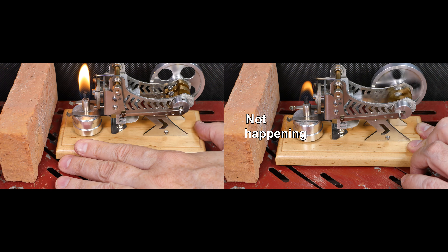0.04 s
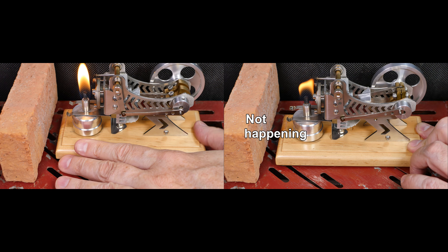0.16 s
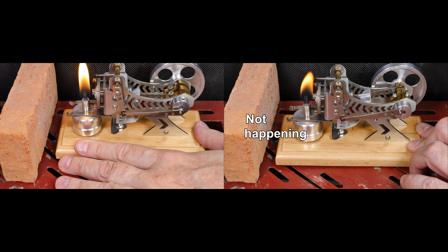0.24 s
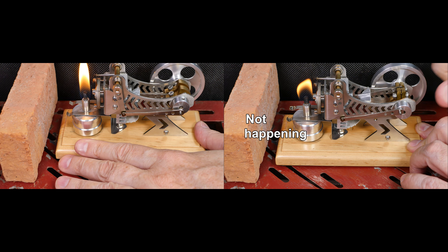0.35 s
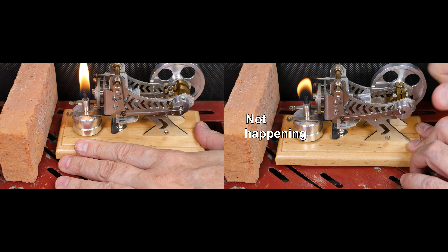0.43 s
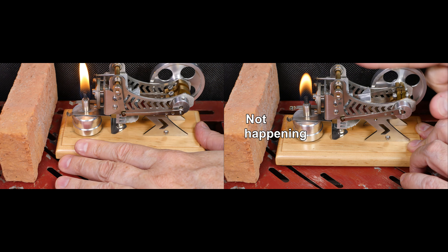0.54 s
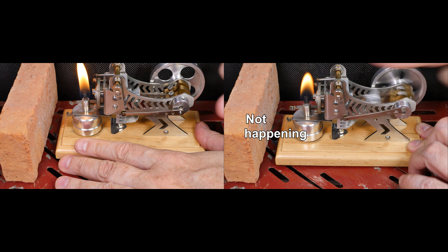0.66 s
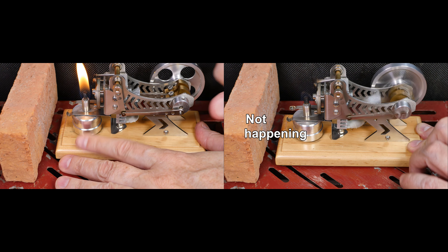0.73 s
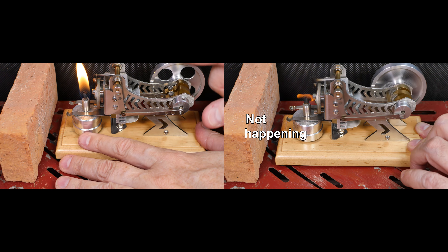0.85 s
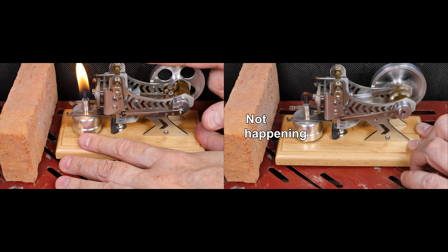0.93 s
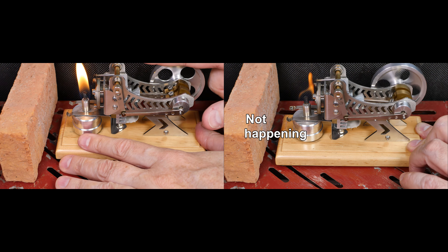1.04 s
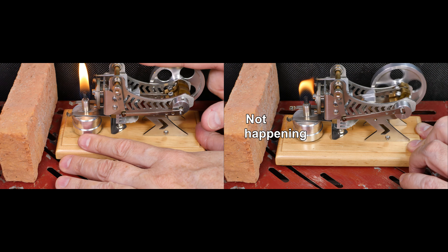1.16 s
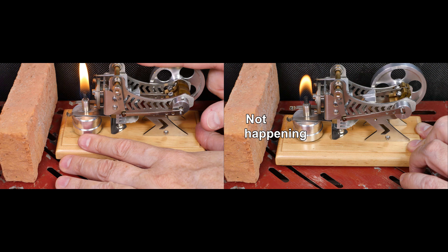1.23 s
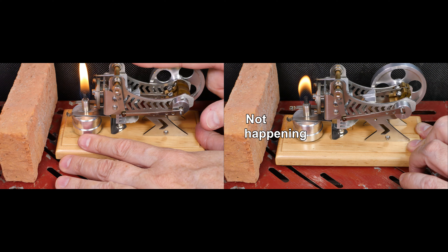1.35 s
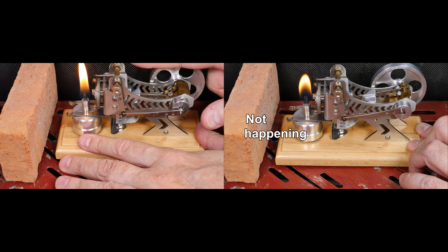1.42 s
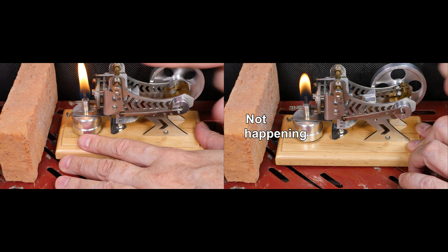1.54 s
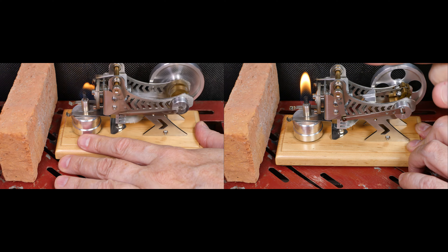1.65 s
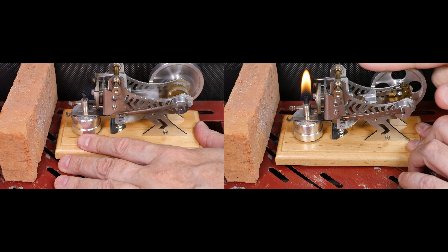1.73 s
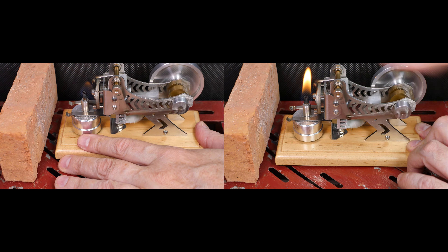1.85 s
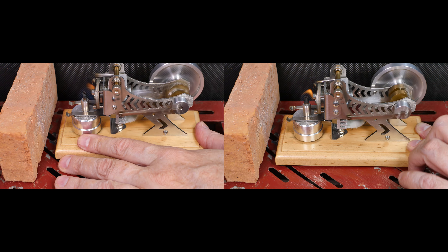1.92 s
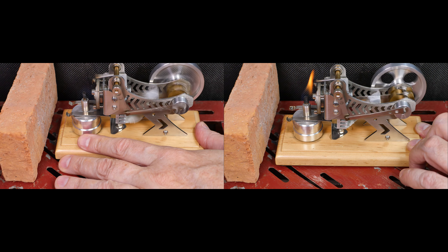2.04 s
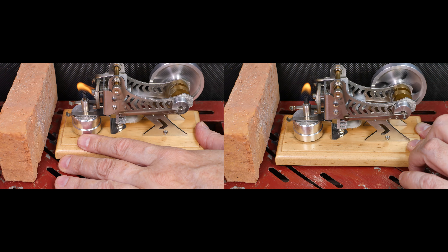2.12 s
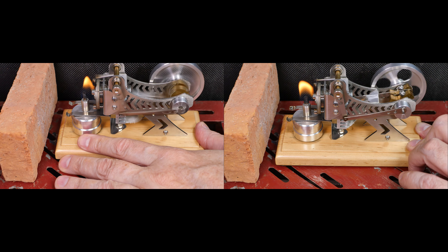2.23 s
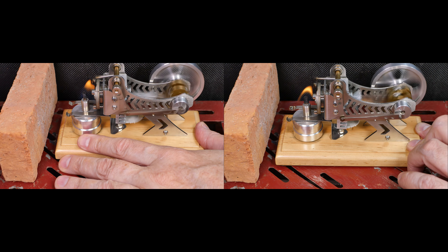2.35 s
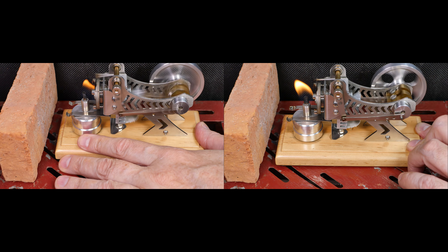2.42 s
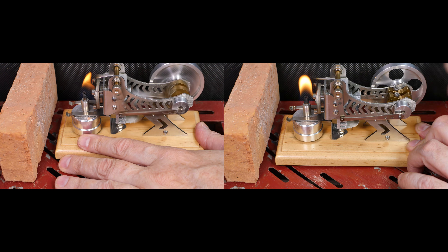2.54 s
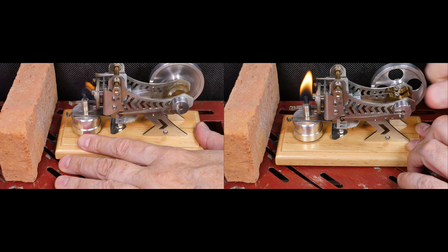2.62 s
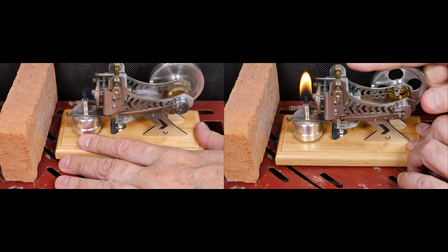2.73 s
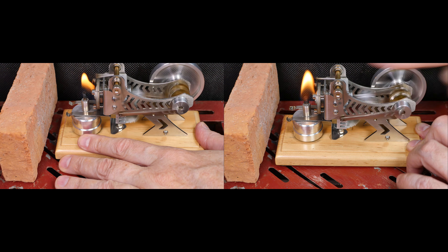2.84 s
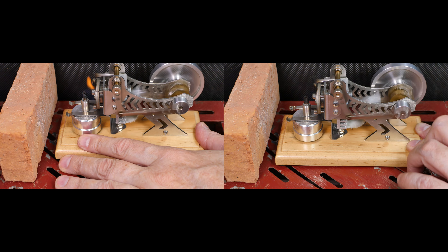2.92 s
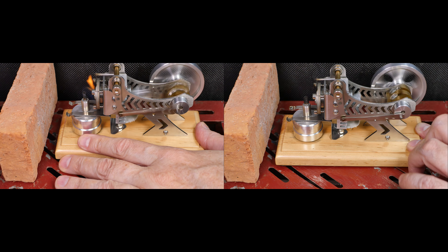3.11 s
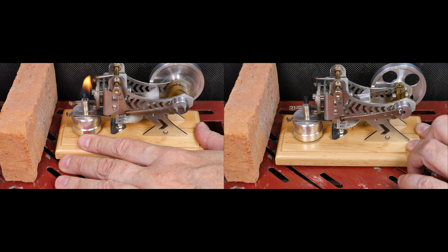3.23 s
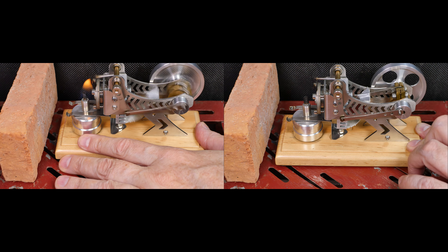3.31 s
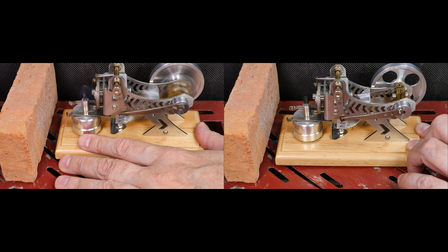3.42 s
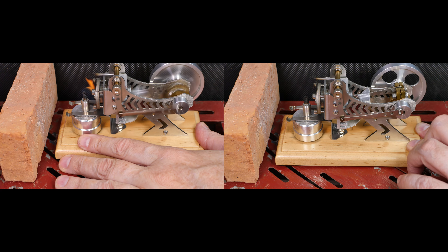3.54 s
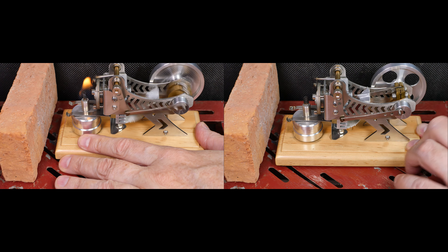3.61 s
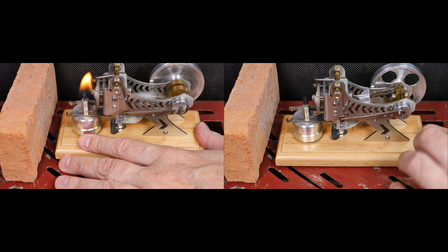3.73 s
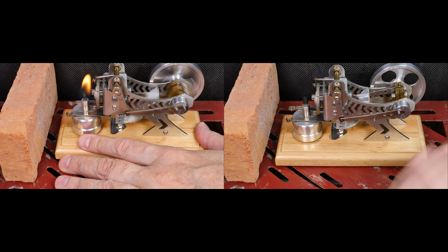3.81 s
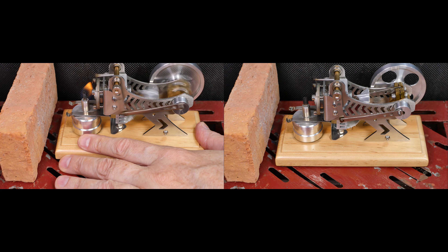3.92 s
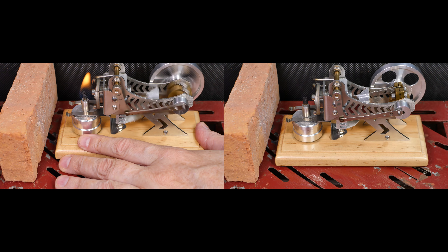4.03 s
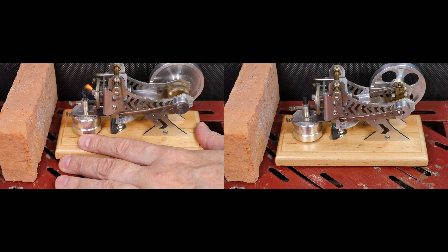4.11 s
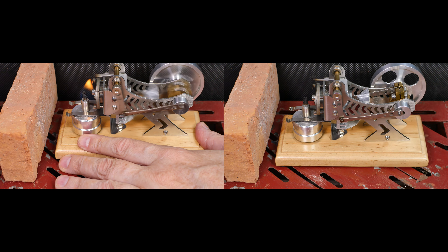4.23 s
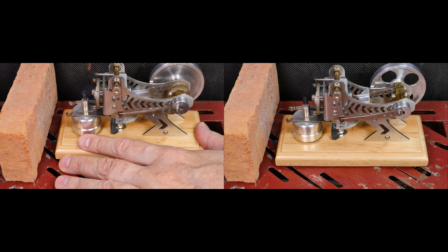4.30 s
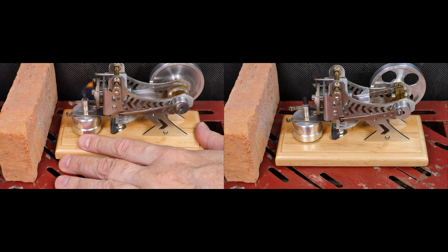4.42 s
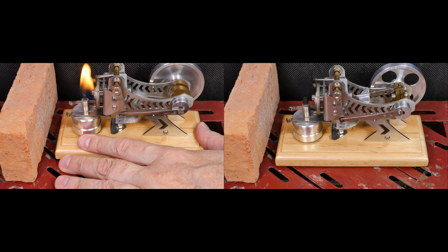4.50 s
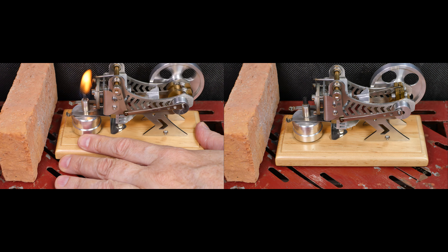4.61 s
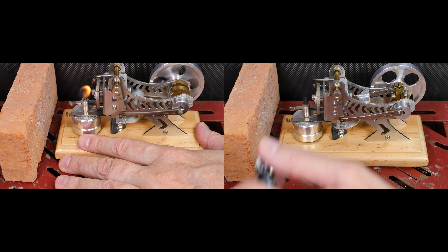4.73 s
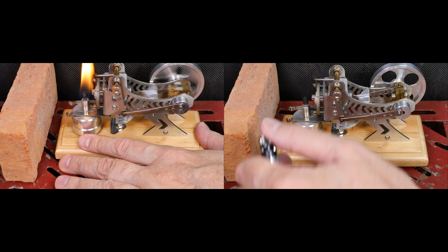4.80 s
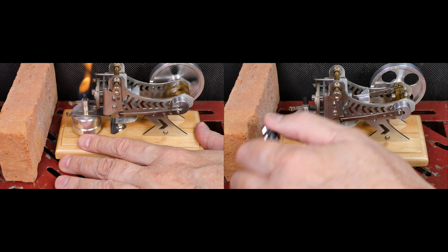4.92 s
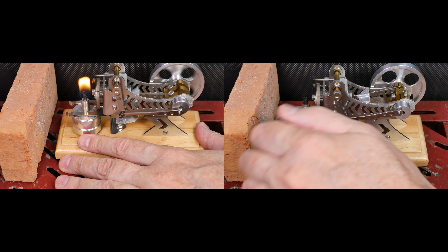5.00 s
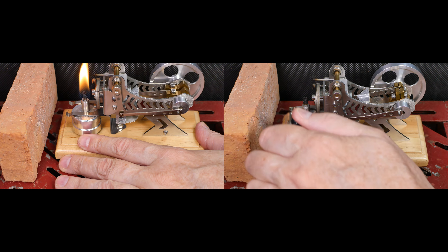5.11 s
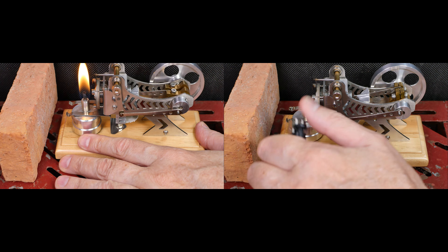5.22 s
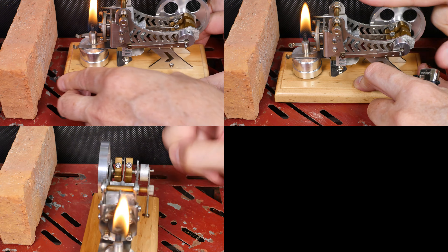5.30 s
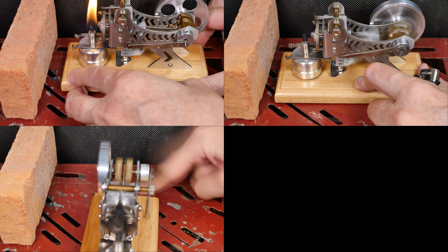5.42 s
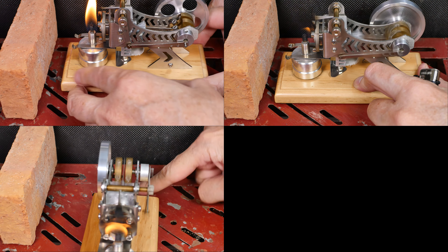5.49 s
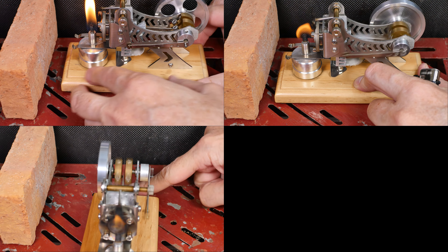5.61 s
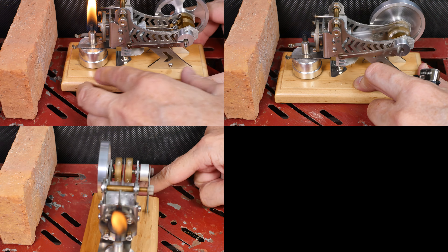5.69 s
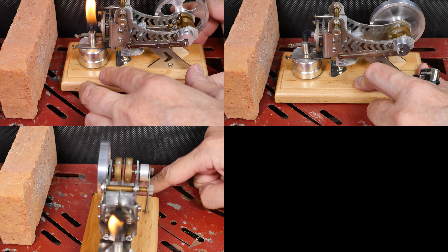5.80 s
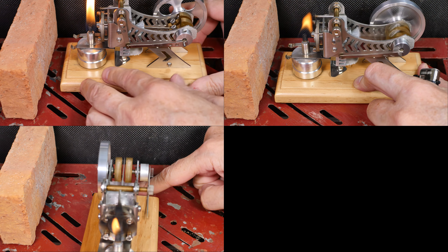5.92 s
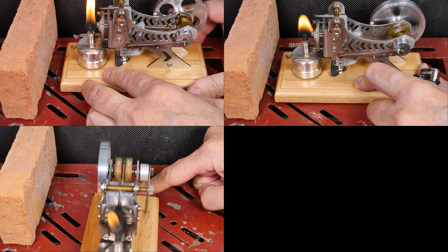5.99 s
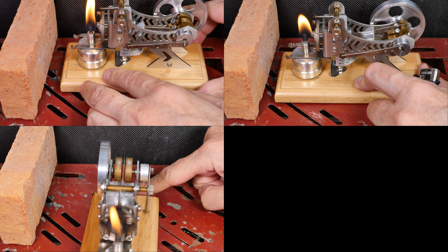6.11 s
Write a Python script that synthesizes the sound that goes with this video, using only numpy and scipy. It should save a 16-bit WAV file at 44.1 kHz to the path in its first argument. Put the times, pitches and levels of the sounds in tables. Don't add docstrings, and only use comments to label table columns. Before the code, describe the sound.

Sharp metallic clacks with hollow air pops race in a gradually slowing clatter, stop with ticks and scrapes, then burst back over quiet porch air.

```python
import sys
import numpy as np
from scipy import signal
from scipy.fft import rfft, irfft, next_fast_len
from scipy.io import wavfile

SR = 44100
rng = np.random.default_rng(int(sys.argv[2]) if len(sys.argv) > 2 else 0)


def nominal_scale(level):
    x = np.asarray(level, float) / 20
    return 10 ** x


def to_wav(sig):
    pcm = np.clip(np.atleast_2d(sig), -1, 1) * 32767
    pcm = np.round(pcm).astype(np.int16)
    wavfile.write(sys.argv[1], SR, pcm.T)


N = 271215


def rms_one(x):
    return x / np.sqrt(np.mean(x ** 2) + 1e-20)


def at_hz(points, hz, column=1):
    points = np.array(points)
    return np.interp(np.log(hz), np.log(points[:, 0]), points[:, column])


def drift(rate):
    r = np.exp(-80 * np.pi * rate / SR)
    white = rng.standard_normal(N // 40 + 2002)
    slow = signal.lfilter([1], [1, -2 * r, r * r], white)[2000:]
    return np.interp(np.arange(N) / 40, np.arange(len(slow)), rms_one(slow))


def clicks(times, sizes):
    train = np.full(N, 1e-18)
    where = np.clip((np.asarray(times) * SR).astype(int), 0, N - 1)
    np.add.at(train, where, sizes)
    return train


def resonance(x, hz, width_hz):
    r = np.exp(-np.pi * width_hz / SR)
    poles = [1, -2 * r * np.cos(2 * np.pi * hz / SR), r * r]
    return signal.lfilter([(1 - r * r) / 2, 0, (r * r - 1) / 2], poles, x)


def panned(db):
    return nominal_scale(np.array([db / 2, -db / 2]))


def bands(length):
    edges_hz = 25 * 2 ** np.arange(0, 9.6, .5)
    white = rng.standard_normal((2, 2, length))
    for k, (low, high) in enumerate(zip(edges_hz, edges_hz[1:])):
        sos = signal.butter(2, [low, high], "band", fs=SR, output="sos")
        mid, side = signal.sosfilt(sos, white[k % 2])
        yield np.sqrt(low * high), mid, side


def stereo(mid, side, alike):
    alike = np.clip(alike, -1, 1)
    return np.sqrt(1 + alike) * mid + np.sqrt(1 - alike) * side * [[1], [-1]]


# frequency in Hz, level in dB per Hz.
OUTDOORS_SPECTRUM = [(25, -27), (60, -18.5), (110, -6.5), (185, -8), (430, -5.5), (800, -12.5),
                     (2000, -23.5), (5500, -74), (9500, -56), (16000, -36)]
# frequency in Hz, likeness from -1 to 1.
OUTDOORS_LIKENESS = [(60, -0.47), (240, 0.2), (950, 0.15), (3770, -0.29), (15000, 0.49)]


def outdoors():
    floor = 0
    for hz, mid, side in bands(N):
        level_db = at_hz(OUTDOORS_SPECTRUM, hz) + 0.16 * drift(6.3)
        floor = floor + nominal_scale(level_db) * stereo(mid, side, at_hz(OUTDOORS_LIKENESS, hz))
    floor = floor + 2.2 * resonance(floor, 188, 16)
    return nominal_scale(-55) * rms_one(floor)


# time in seconds, level in dB.
INSECT_CALL = [(.08, -95), (.14, -74), (.58, -74), (.65, -95)]


def insect():
    t = np.arange(N) / SR
    s, db = np.transpose(INSECT_CALL)
    level_db = np.interp(t, s, db) + 1.2 * drift(20)
    return nominal_scale(level_db) * np.sin(2 * np.pi * 5190 * t + 0.24 * drift(28))


# mode in Hz, width in Hz, level in dB.
BOARD_MODES = [(148, 8, 5), (187, 16, 9), (243, 30, -5), (304, 20, 0.0), (383, 30, 0.0), (700, 30, 0.0),
               (776, 20, 6), (885, 30, 3), (1200, 50, -3)]


def board(x):
    return sum((-1) ** k * nominal_scale(db) * resonance(x, hz, width_hz)
               for k, (hz, width_hz, db) in enumerate(BOARD_MODES))


# start in seconds, stop in seconds, piston hiss in dB, board rumble in dB,
# hiss lost by the stop in dB.
SPINS_SEEN = [
    (-.1, 0, -44.5, -46.5, 1),
    (0.677, 1.036, -41.5, -42, 12.5),
    (1.583, 4.565, -42.5, -41, 14.5),
    (1.813, 2.13, -52, -35, 28),
    (2.9, 3.17, -49.5, -37.5, 11),
    (4.6, 5.01, -55, -52, 3.5),
    (5.354, 6.2, -38.5, -40, 9),
    (5.356, 5.807, -40.5, -34, 27),
]


def motion():
    push_db_per_s, stall_db_per_s, rumble_follows = 1100, 128, 0.29
    t = np.arange(N) / SR
    hiss, rumble = nominal_scale(2 * -64.5), nominal_scale(2 * -58)
    for start_s, stop_s, hiss_db, rumble_db, lost_db in SPINS_SEEN:
        edges_db = -push_db_per_s * np.maximum(start_s - t, 0)
        edges_db -= stall_db_per_s * np.maximum(t - stop_s, 0)
        slowing_db = -lost_db * np.clip((t - start_s) / (stop_s - start_s), 0, 1)
        hiss = hiss + nominal_scale(2 * (hiss_db + slowing_db + edges_db))
        rumble = rumble + nominal_scale(2 * (rumble_db + rumble_follows * slowing_db + edges_db))
    return 10 * np.log10(hiss), 10 * np.log10(rumble)


# frequency in Hz, level in dB per Hz.
HISS_SPECTRUM = [(710, -34), (1200, -1.5), (1930, -3.5), (2380, -8.5), (2890, 0.5), (7660, -11.5),
                 (8820, -1.5), (14700, -22.5), (16000, -34)]
# frequency in Hz, level in dB per Hz.
RUMBLE_SPECTRUM = [(15, -65), (25, -32), (92, -28.5), (156, -17), (430, -8), (501, -10.5), (575, -12.5),
                   (743, -6.5), (1010, -13.5), (1500, -15), (1950, -45), (3300, -120)]
# frequency in Hz, left-right difference in dB.
LEAN_LEFT = [(60, 3), (180, 5.5), (550, -0.5), (1650, -5.5), (4970, -2), (15000, 1.5)]


def sliding(hiss_db, rumble_db, patchy_db, rough_db):
    hiss, rumble = 0, 0
    grip = drift(71) * np.clip((hiss_db + 66.5) / 10, 0, 1)
    for hz, mid, side in bands(N):
        near = panned(at_hz(LEAN_LEFT, hz))[:, None] * stereo(mid, side, min(hz / 250, .7))
        near = near * nominal_scale(rough_db * grip + patchy_db * drift(6.8))
        if hz > 1200:
            hiss = hiss + nominal_scale(at_hz(HISS_SPECTRUM, hz)) * near
        else:
            rumble = rumble + nominal_scale(at_hz(RUMBLE_SPECTRUM, hz)) * near
    rumble = rumble + 0.73 * board(rumble)
    return nominal_scale(hiss_db) * rms_one(hiss) + nominal_scale(rumble_db) * rms_one(rumble)


# centre in seconds, length in seconds, level in dB, pitch in Hz.
DULL_RUBS = [
    (0.92, 0.087, -48.5, 1000),
    (1.86, 0.16, -50.5, 1230),
    (.645, 0.0078, -48, 180),
    (5.385, 0.029, -34, 190),
    (4.68, .02, -53, 140),
]


def drags():
    t, out = np.arange(N) / SR, 0
    grains = rng.standard_normal(N) * nominal_scale(2.2 * drift(90))
    for s, length_s, db, hz in DULL_RUBS:
        width_hz = 1.23 * hz
        rub = resonance(resonance(grains, hz, width_hz), hz, width_hz)
        out = out + nominal_scale(db) * np.exp(-.5 * ((t - s) / length_s) ** 2) * rms_one(rub)
    return out


# centre in seconds, length in seconds, level in dB.
BRIGHT_RUBS = [
    (0.684, 0.0037, -33),
    (4.874, 0.0033, -37.5),
    (4.924, 0.0072, -36.5),
    (4.957, 0.055, -54.5),
    (5.382, 0.016, -46),
]


def scrapes():
    t = np.arange(N) / SR
    swell = sum(nominal_scale(db) * np.exp(-.5 * ((t - s) / length_s) ** 2) for s, length_s, db in BRIGHT_RUBS)
    grains = rng.standard_normal(N) * nominal_scale(1.2 * drift(180))
    return swell * rms_one(resonance(grains, 7600, 6000) + resonance(grains, 10600, 2100))


# time in seconds, peak in dB.
FRAME_BLOWS = [
    (0.0024, -38),
    (0.0344, -61),
    (1.0515, -35.5),
    (2.138, -33.5),
    (4.3875, -45),
    (4.7341, -40),
    (4.7514, -74),
]
# mode in Hz, width in Hz, level in dB.
FRAME_MODES = [(2430, 150, -11), (2660, 100, -15), (3190, 40, 0), (3290, 40, -2), (3430, 50, -4),
               (3545, 40, 1), (3680, 60, -4)]


def clinks(level_db, rattle_s, rattle_db):
    s, peak_db = np.transpose(FRAME_BLOWS)
    blows = clicks(s, nominal_scale(peak_db + level_db))
    t = np.arange(int(.3 * SR)) / SR
    rattle = nominal_scale(rattle_db) * signal.oaconvolve(blows, np.exp(-t / rattle_s))[:N]
    return sum(nominal_scale(db) * resonance(blows + rattle * rng.standard_normal(N), hz, width_hz)
               for hz, width_hz, db in FRAME_MODES)


# clack in seconds, pop lag in ms, clack in dB,
# pop in dB, port snap in dB.
SECOND_TURNS = [(.6798, 3.9, -21.5, -21.5, -46), (.749, 3.3, -17, -18.5, -11),
                (.8425, 6.55, -23.5, -16, -13), (1.829, 5.3, -27, -18, -18),
                (1.9121, 3.24, -21.5, -15.5, -21), (2.8965, 2.15, -17, -18.5, -34),
                (2.957, 4, -18.5, -17.5, -16), (3.0509, 9.7, -26.5, -21.5, -22),
                (5.3746, 5.74, -19.5, -18, -54), (5.441, 4, -19.5, -18.5, -20.5),
                (5.5208, 3.6, -21, -17.5, -42), (5.622, 2.27, -24, -17.5, -20),
                (5.7493, 3.2, -24.5, -19.5, -19.5)]


def snaps(lag_s, snap_hz, snap_s, crack_s, crack_db, boost_db):
    s, lag_ms, _, _, peak_db = np.transpose(SECOND_TURNS)
    t = np.arange(int(.01 * SR)) / SR
    crack = nominal_scale(crack_db) * np.diff(rng.standard_normal(len(t) + 1)) * np.exp(-t / crack_s)
    shape = crack - np.sin(2 * np.pi * snap_hz * t) * np.exp(-t / snap_s)
    blows = clicks(s + lag_ms / 1000 + lag_s, nominal_scale(peak_db + boost_db))
    return signal.oaconvolve(blows, shape)[:N]


# turn number, length of the turn in ms.
LONG_RUN_TURNS = [(1, 57.41), (3, 52.48), (9, 61.93), (11, 63.58), (19, 71.33), (21, 75.72), (28, 97.46),
                  (33, 109.47), (37, 115.84)]
# turn number, length of the turn in ms.
SHORT_RUN_TURNS = [(1, 55.47), (6, 60.91), (9, 74.28), (11, 76.8)]
# first clack in seconds, clack in dB, pop in dB at the fastest,
# linkage tick in dB at the fastest, high modes in dB relative.
RUN_LEVELS = [
    (1.5802, -25, -23.5, -30, -0.5),
    (5.3769, -23.5, -25, -39, -3),
]


def turns():
    fastest_ms = 55
    rows = []
    for lengths, (start_s, *levels_db) in zip((LONG_RUN_TURNS, SHORT_RUN_TURNS), RUN_LEVELS):
        number, ms = np.transpose(lengths)
        ms = np.interp(np.arange(1, number[-1] + 2), number, ms)
        s = start_s + np.cumsum(ms) / 1000 - ms / 1000
        rows += [(a, b - fastest_ms, b / 1000, *levels_db) for a, b in zip(s, ms)]
    return np.transpose(rows)


# low modes in dB, high modes in dB, left-right in dB,
# upper pop mode in dB, thump in dB.
ENGINE_COLOUR = [
    (-2, -4, 1, -6.5, -40),
    (-9.5, -10.5, 1, -7.5, -28),
]
BLOW_SPREAD = (1.2, 2, 1.5, 1.5, .6, 2, 4)
# time in seconds, level in dB, thump in dB relative.
SHOVES = [
    (0.682, -33.5, 6),
    (1.048, -41, -34),
    (1.835, -38, 10.5),
    (2.899, -46, 4),
    (3.061, -38, 1),
    (4.693, -44, -15),
    (4.734, -35, -30),
    (4.88, -36, -2),
    (5.341, -30.5, -20),
    (5.379, -49, 4.5),
]


def pop_rows():
    s, slow_ms, _, _, pop_db, _, _ = turns()
    first, second = ENGINE_COLOUR
    pop_lag_s, pop_db_per_ms = 0.001526, 0.0186
    peak_db = pop_db + pop_db_per_ms * slow_ms
    rows = np.array([(a + pop_lag_s, db, *first[3:]) for a, db in zip(s, peak_db)])
    rows[:, 1:] += rng.standard_normal((len(rows), 3)) * BLOW_SPREAD[4:]
    flicks = [(a + ms / 1000, db, *second[3:]) for a, ms, _, db, _ in SECOND_TURNS]
    shoves = [(a, db, second[3], thump_db) for a, db, thump_db in SHOVES]
    return np.vstack([rows, flicks, shoves])


# frequency in Hz, level in dB, decay in seconds.
CYLINDER_MODES = [
    (740, -2, .0040),
    (865, 6, .0040),
    (1210, -12, .0026),
]


def pops(lag_s, open_s, thump_hz, thump_s, thump_db, gulp_hz, gulp_end_hz, gulp_s, gulp_db, boost_db, board_db):
    s, peak_db, upper_db, low_db = pop_rows().T
    t = np.arange(int(.12 * SR)) / SR
    opening = 1 - np.exp(-t / open_s)
    lower, upper, top = (nominal_scale(db) * np.sin(2 * np.pi * hz * t) * np.exp(-t / decay_s) * opening
                         for hz, db, decay_s in CYLINDER_MODES)
    thump = np.sin(2 * np.pi * thump_hz * t) * np.exp(-t / thump_s)
    cavity_hz = gulp_end_hz + (gulp_hz - gulp_end_hz) * np.exp(-t / gulp_s)
    gulp = np.sin(2 * np.pi * np.cumsum(cavity_hz) / SR) * np.exp(-t / gulp_s) * (1 - np.exp(-t / 0.0066))
    luck_db = 0.68 * rng.standard_normal((len(s), 3))
    layers = ((lower, luck_db[:, 0]), (upper, upper_db), (top, luck_db[:, 1]),
              (thump, low_db + thump_db), (gulp, gulp_db + luck_db[:, 2]))
    out = np.zeros(N)
    for shape, db in layers:
        out -= signal.oaconvolve(clicks(s + lag_s, nominal_scale(peak_db + db + boost_db)), shape)[:N]
    out += nominal_scale(board_db) * board(out)
    return out * panned(at_hz(LEAN_LEFT, 940))[:, None]


# time in seconds, peak of the middle modes in dB,
# low modes in dB relative, high modes in dB relative.
STRAY_TICKS = [(.72, -41, 5, -8), (.967, -37, 1, -30), (1.0494, -32.5, 0, -3.5), (1.5278, -44, 2, -9),
               (1.5564, -40, 7.5, -5), (2.137, -20.5, -3, -8), (4.6392, -39.5, -2, -1.5),
               (4.6627, -41.5, 1, -10.5), (4.6991, -38, 0, -8), (4.7244, -36, -9, -5), (4.734, -29, 4, -7),
               (4.855, -43, 0, -4), (4.8664, -48, -13, -6), (4.8736, -36, -1, -13), (4.9211, -31.5, -1, -5),
               (5.0015, -42, 2, -4), (5.324, -54, 2, -2), (5.3426, -34.5, 8, -6), (5.359, -28, -2.5, -5),
               (5.407, -29, 2.5, -5), (5.4652, -28.5, 0, -8), (5.9642, -26.5, 0, -4.5)]


def clack_rows():
    tick_share, tick_db_per_ms = .56, -.5
    low_db_per_ms = -0.0468
    s, slow_ms, length_s, clack_db, _, tick_db, bright_db = turns()
    first, second = ENGINE_COLOUR
    tick_s = s + tick_share * length_s
    rows = [(a, db, *first[:3]) for a, db in zip(s, clack_db)]
    rows += [(a, db, *first[:3]) for a, db in zip(tick_s, tick_db + tick_db_per_ms * slow_ms)]
    rows = np.array(rows)
    rows[:, 2] += np.tile(low_db_per_ms * slow_ms, 2)
    rows[:, 3] += np.tile(bright_db, 2)
    rows[:, 1:] += rng.standard_normal((len(rows), 4)) * BLOW_SPREAD[:4]
    flicks = [(a, db, *second[:3]) for a, _, db, _, _ in SECOND_TURNS]
    strays = [(*row, second[2]) for row in STRAY_TICKS]
    return np.vstack([rows, flicks, strays])


# mode in Hz, width in Hz, level in dB.
VALVE_MODES = [
    [(1794, 310, -1.5), (2317, 287, 5), (3240, 1190, -5.5)],
    [(4450, 1640, -1.5), (5058, 1270, 2.5), (6140, 200, -0.5), (6500, 290, -3)],
    [(8530, 1150, 4), (9900, 160, 7), (11970, 3000, -2), (13900, 830, -15)],
]


def clacks(rise_s, fall_s, lead_s, lead_db, alike, boost_db):
    s, peak_db, low_db, high_db, pan_db = clack_rows().T
    half = int(.03 * SR)
    t = np.arange(-half, half + 1) / SR
    burst = (t > 0) * np.clip(0.32 + 0.55 * t / rise_s, 0, 1) * np.exp(-np.maximum(t - rise_s, 0) / fall_s)
    burst += nominal_scale(lead_db) * np.exp(-np.abs(t) / lead_s)
    habit = rng.standard_normal(len(t))
    chance = rng.standard_normal(N)
    out = np.zeros((2, N))
    for modes, group_db in zip(VALVE_MODES, (low_db, 0, high_db)):
        size = nominal_scale(peak_db + group_db + boost_db)
        gains = panned(pan_db + at_hz(LEAN_LEFT, modes[1][0]))
        train = np.array([clicks(s, size * gain) for gain in gains])
        force = alike * signal.oaconvolve(train, [burst * habit], "same", axes=1)
        force += np.sqrt(1 - alike ** 2) * chance * signal.oaconvolve(train, [burst], "same", axes=1)
        for k, (hz, width_hz, level_db) in enumerate(modes):
            out += (-1) ** k * nominal_scale(level_db) * resonance(force, hz, width_hz)
    return out


# frequency in Hz, time to fall 60 dB in seconds, level in dB, left-right likeness.
PORCH_ECHO = [(140, 0.057, -34, 0.23), (370, 0.12, -28, 0.34), (810, 1, -36, 0.56),
              (1390, 0.5, -20.5, 0.63), (3070, 0.12, -17, 0.61), (5960, 0.5, -24.5, 0.5),
              (12600, 0.16, -17, 0.067)]


def porch(x, gap_s):
    t, echo = np.arange(int(.6 * SR)) / SR, 0
    for hz, mid, side in bands(len(t)):
        fade = nominal_scale(at_hz(PORCH_ECHO, hz, column=2) - 60 * t / at_hz(PORCH_ECHO, hz))
        echo = echo + fade * stereo(mid, side, at_hz(PORCH_ECHO, hz, column=3))
    echo *= 0.14 * np.clip(t / gap_s - 1, 0, 1)
    return signal.oaconvolve(x[None], echo, axes=1)[:, :N]


def scene():
    hiss_db, rumble_db = motion()
    background = outdoors() + insect()
    background += sliding(hiss_db + 0.5, rumble_db - 4.0, patchy_db=2.5, rough_db=3.0)
    blows = clacks(rise_s=0.002, fall_s=0.0013, lead_s=0.008, lead_db=-20.5, alike=0.58, boost_db=6)
    blows += pops(lag_s=0.001308, open_s=0.0003, thump_hz=265, thump_s=.004, thump_db=0.5, gulp_hz=600,
                  gulp_end_hz=380, gulp_s=.028, gulp_db=-17, boost_db=-0.5, board_db=0.0)
    blows += snaps(lag_s=0.0014, snap_hz=2000, snap_s=0.00038, crack_s=0.00025, crack_db=-1, boost_db=1.0)
    blows += clinks(level_db=40.5, rattle_s=0.065, rattle_db=-32) + scrapes() + drags()
    blows = signal.sosfilt(signal.butter(3, 130, "high", fs=SR, output="sos"), blows)
    turn = 0.58 * drift(3.1)
    mono = blows.mean(axis=0)
    echo = porch(np.cos(turn) * mono, gap_s=0.0008) + porch(np.sin(turn) * mono, gap_s=0.0008)
    return blows + echo + background


def band_limit(x):
    return signal.sosfilt(signal.butter(12, 16480, fs=SR, output="sos"), x)


# frequency in Hz, gain in dB.
MIC_RESPONSE = [(7600, 0), (7820, -7), (8050, 0), (10700, 0), (11300, -8), (15200, -10), (15700, -24),
                (16500, -60)]


def record(dry):
    size = next_fast_len(N)
    hz = np.maximum(np.fft.rfftfreq(size, 1 / SR), 1)
    colour = nominal_scale(at_hz(MIC_RESPONSE, hz))
    mix = irfft(rfft(dry, size) * colour, size)[:, :N]
    return band_limit(mix)


dry = scene()
out = record(dry)
to_wav(out)
```